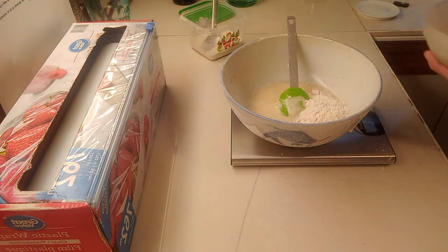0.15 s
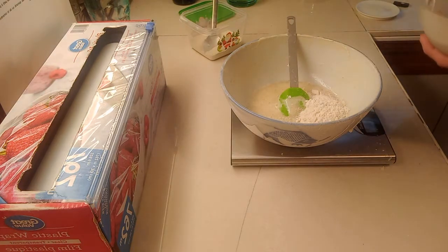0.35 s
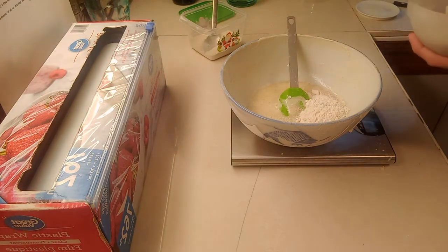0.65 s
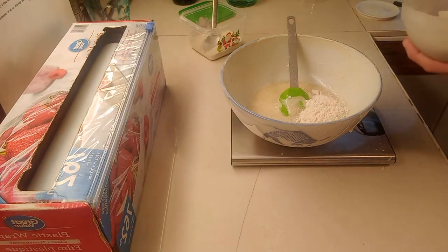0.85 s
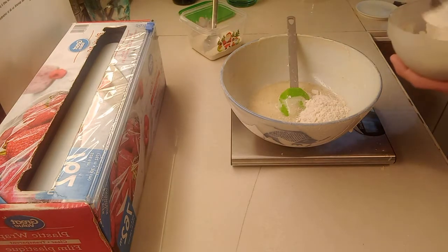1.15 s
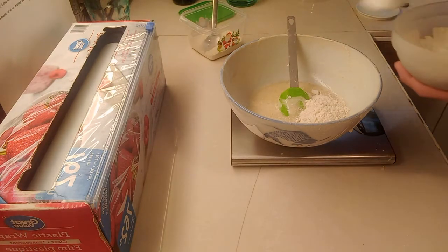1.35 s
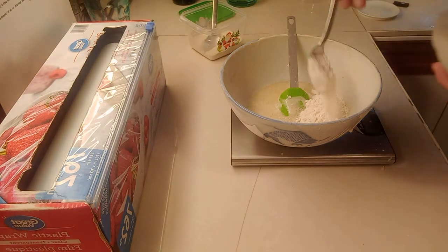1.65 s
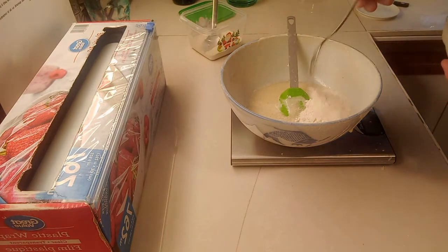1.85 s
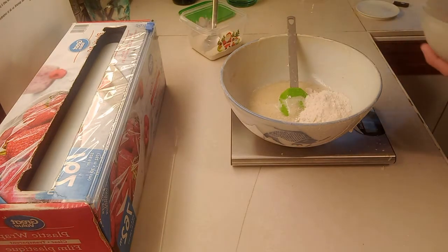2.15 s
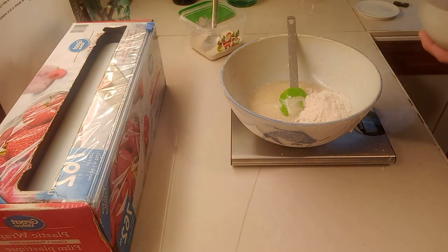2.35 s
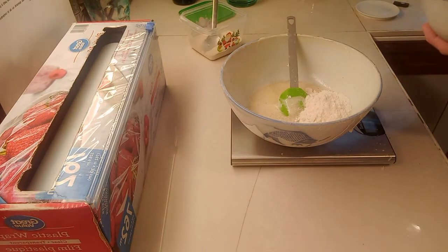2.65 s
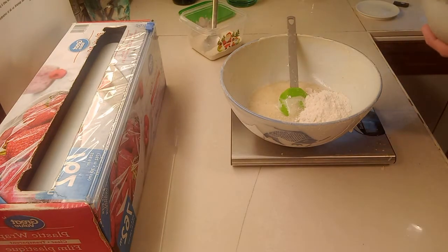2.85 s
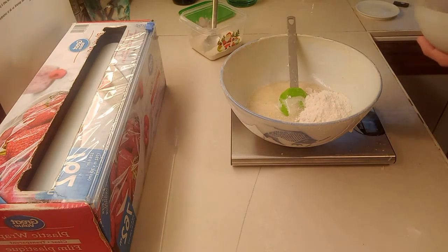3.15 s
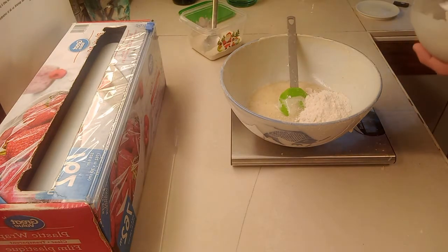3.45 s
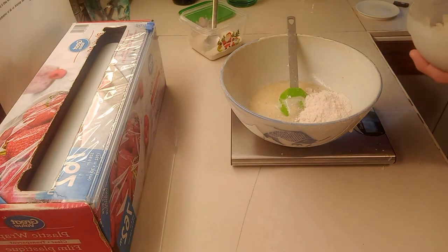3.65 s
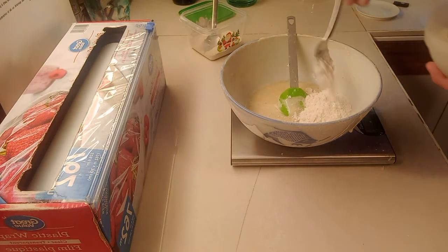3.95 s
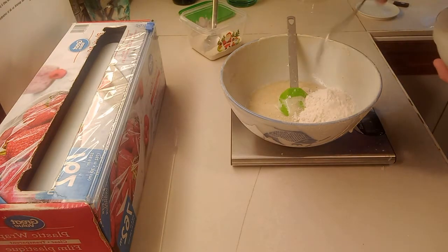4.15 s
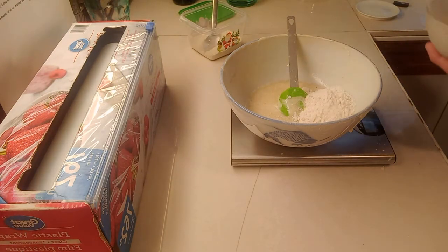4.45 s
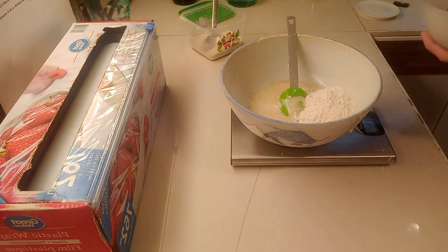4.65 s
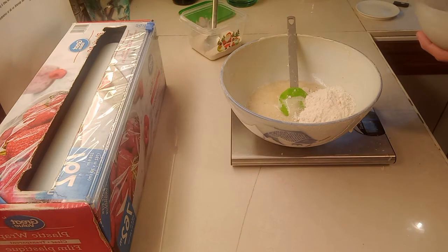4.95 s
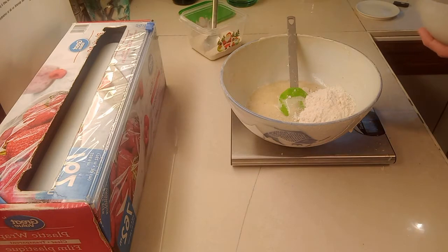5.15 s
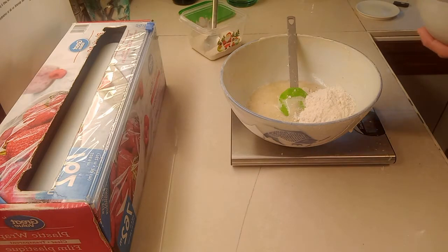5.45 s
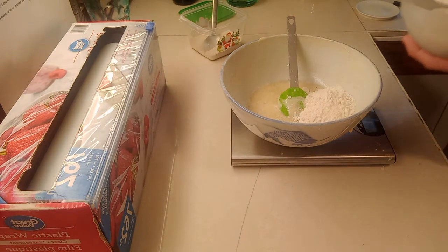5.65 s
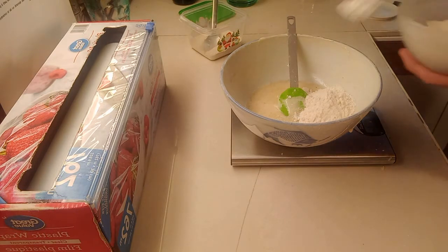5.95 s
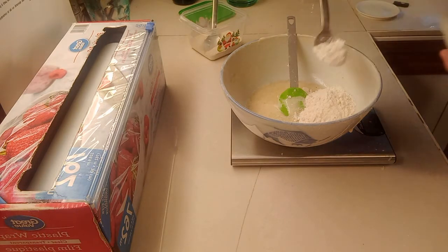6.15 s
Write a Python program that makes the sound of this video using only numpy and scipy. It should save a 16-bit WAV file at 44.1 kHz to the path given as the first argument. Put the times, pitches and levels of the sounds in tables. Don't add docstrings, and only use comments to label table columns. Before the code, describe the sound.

A bright spoon clink on ceramic, two short crunchy flour scoops, a pair of taps, light ticks, a slow scrape and muffled knock over faint room rumble.

```python
import sys
import numpy as np
from scipy import signal
from scipy.fft import rfft, irfft
from scipy.io import wavfile
from scipy.ndimage import uniform_filter1d

SR = 44100
rng = np.random.default_rng(int(sys.argv[2]) if len(sys.argv) > 2 else 0)


def transcribe(u):
    v = np.clip(np.atleast_2d(u).T, -1, 1)
    q = np.round(v * 32767).astype(np.int16)
    wavfile.write(sys.argv[1], SR, q)


def volts_from_db(level):
    exponent = np.asarray(level, float) / 20
    return 10 ** exponent


N = 278214

# frequency in Hz, density in dB per Hz.
FAINT_CRACK = [(500, -14.5), (2000, -4.5), (3300, -0.5), (5000, -6), (7500, 3.5), (9500, 0), (16000, -22)]


def evened(x):
    return x / np.sqrt(np.mean(x ** 2) + 1e-20)


def read(points, hz):
    f, value = np.transpose(points)
    return np.interp(np.log(hz + 1), np.log(f + 1), value)


def coloured(x, points):
    hz = abs(np.fft.fftfreq(4096, 1 / SR))
    log_gain = np.log(volts_from_db(np.maximum(read(points, hz), -100)))
    response = np.exp(np.conj(signal.hilbert(log_gain)))
    taps = np.fft.ifft(response).real[:2048]
    taps = taps.reshape((1,) * (x.ndim - 1) + (-1,))
    return signal.oaconvolve(x, taps, axes=-1)[..., :x.shape[-1]]


def resonate(x, hz, width):
    r = np.exp(-np.pi * width / SR)
    return 2 * signal.lfilter([1 - r], [1, -r * np.exp(2j * np.pi * hz / SR)], x).real


def mode_sum(x, modes):
    return sum(volts_from_db(db) * evened(resonate(resonate(x, hz, w), hz, w)) for hz, w, db in modes)


def spaced(x, lag, left_db):
    f = np.fft.rfftfreq(x.shape[-1])
    late = irfft(rfft(x[0]) * np.exp(-2j * np.pi * f * lag), x.shape[-1])
    return np.array([late * volts_from_db(left_db), x[1]])


def add(mix, s, sound):
    part = mix[:, round(s * SR):][:, :sound.shape[1]]
    part += sound[:, :part.shape[1]]


def hits(rows, modes, crack_colour, crack_s, rise_s, side=((500, .1), (15000, .1)), hold=0.95,
         inverted=None, apart=False):
    ring_turn = .24
    cracks, rings = np.zeros((2, N)), np.zeros((2, N))
    t = np.arange(SR // 2) / SR
    side, rise = np.array(side), 1 - np.exp(-t / rise_s)
    hz, db, t60 = np.transpose(modes)[:, :, None]
    for s, peak_db, ring_db, tilt_db, lag in rows:
        shared, own = rng.standard_normal(len(t)), rng.standard_normal((2, len(t)))
        tilted = [(f, level + tilt_db * np.log2(f / 2000)) for f, level in crack_colour]
        contact = np.exp(-(t / crack_s) ** hold) * rise
        crack = coloured((0.94 * shared + 0.51 * own) * contact, tilted)
        crack = np.array([coloured(crack[0], side * [1, .5]), coloured(crack[1], side * [1, -.5])])

        if inverted is None:
            phase = rng.uniform(0, 2 * np.pi, (len(modes), 1))
        else:
            phase = np.pi * np.isin(hz, inverted)
        phase = np.array([phase + 2 * np.pi * (hz * lag / SR + ring_turn), phase])
        level = db + tilt_db * np.log2(hz / 2000) - 60 * t / t60
        lean = np.array([.5, -.5])[:, None, None] * read(side, hz)
        ring = (volts_from_db(level + lean) * np.sin(2 * np.pi * hz * t + phase)).sum(1) * rise

        for out, part, part_db in ((cracks, crack, 0), (rings, ring, ring_db)):
            add(out, s, volts_from_db(peak_db + part_db) * spaced(part / abs(part).max(), lag, -0.55))
    return (cracks, rings) if apart else cracks + rings


def strokes(rows, spoon, grit, lag):
    range_db = 30
    out = np.zeros((2, N))
    for peak_s, pressure_db, swell_s, fade_s, bright_db in rows:
        t = np.arange(-swell_s, fade_s, 1 / SR)
        force_db = 3.1 * np.minimum(rng.exponential(1, (3, SR // 2)), 5)
        slips = rng.standard_normal((3, SR // 2)) * volts_from_db(force_db)
        slips *= rng.random((3, SR // 2)) < 9000 / SR
        slips = slips[2] + slips[:2] / 2
        low = mode_sum(slips, spoon[:3])
        high = evened(mode_sum(slips, spoon[3:])) + 0.78 * evened(coloured(slips, grit))
        sound = (evened(low) + volts_from_db(bright_db) * evened(high))[:, -len(t):]
        sound = sound * volts_from_db(pressure_db - range_db * np.maximum(-t / swell_s, t / fade_s))
        add(out, peak_s - swell_s, spaced(sound * signal.windows.tukey(len(t), .1), lag, -1.2))
    return out


def bed(colour, patchy_db):
    # frequency in Hz, likeness of the sides from 0 to 1.
    likeness = [(60, 0.22), (130, 1), (290, 0.4), (640, 0.99), (1410, 0.057), (3100, 0.016), (6820, 0.63)]
    # frequency in Hz, left level in dB.
    left_levels = [(60, -1), (110, -1), (200, 1.5), (380, -4), (700, -2), (1290, -0.5), (2380, 1.5),
                   (4400, -7), (8120, -0.5), (15000, -1)]
    alike_top_hz = 5000
    far_lag = 14
    frames, hz = N // 512 + 5, np.fft.rfftfreq(2048, 1 / SR)
    a, b, c, d, patches = rng.standard_normal((frames, 1025, 5)).T
    patches = evened(uniform_filter1d(uniform_filter1d(patches, size=6, axis=0), size=8, axis=1))
    same = (np.clip(read(likeness, hz), -1, 1) * (hz < alike_top_hz))[:, None]
    right = a + 1j * b
    delay = np.exp(-2j * np.pi * hz * far_lag / SR)[:, None]
    left = same * right * delay + np.sqrt(1 - same ** 2) * (c + 1j * d)
    z = np.array([left * volts_from_db(read(left_levels, hz))[:, None], right])
    z = z * volts_from_db(read(colour, hz)[:, None] + patchy_db * patches)
    return evened(signal.istft(z, nperseg=2048, noverlap=1536)[1][:, :N])


def background():
    # frequency in Hz, density in dB per Hz.
    rumble_colour = [(18, -64), (30, -39), (52, -13.5), (80, 2), (171, -10.5), (198, -14), (309, -9),
                     (339, -16), (365, -8.5), (415, -7.5), (500, -15.5), (839, -25), (973, -26.5),
                     (1360, -42.5), (2500, -45), (3250, -69.5), (5500, -120)]
    # frequency in Hz, density in dB per Hz.
    hiss_colour = [(590, -26), (1000, 2.5), (1370, -2.5), (3510, -7.5), (4450, -3.5), (4650, -3), (4870, 0),
                   (5610, -7.5), (9850, -8), (15200, -10.5), (16500, -16)]
    # frequency in Hz, width in Hz, level in dB.
    whine_bands = [(4740, 22, -91.5), (10400, 250, -104)]
    # frequency in Hz, level in dB.
    core_hz, core_db = (4756, -93.5)
    t = np.arange(N) / SR
    early_db, settle_s = 4.5, 1.8
    settling = np.exp(-(t / settle_s) ** 2)
    rumble = volts_from_db(-67.5 + early_db * settling) * bed(rumble_colour, patchy_db=2.0)
    hiss = volts_from_db(-82) * bed(hiss_colour, patchy_db=1.34)
    noise = rng.standard_normal((3, N))
    noise = noise[:2] + 0.22 * noise[2]
    whine = mode_sum(noise, whine_bands)
    whine = whine + volts_from_db(core_db) * evened(np.sin(2 * np.pi * core_hz * t))
    return rumble + hiss + whine


def faint_ticks():
    # start in seconds, peak in dB, ring in dB, tilt in dB per octave, left lag in samples.
    ticks = [
        (0.049, -52.5, -13, 0, 11.7),
        (2.8312, -59.5, -3, 0.0021, 8.7),
    ]
    # frequency in Hz, level in dB, t60 in s.
    modes = [(966, 7, 0.03), (4235, -12, 0.067), (5920, -3, 0.06), (7160, -6, 0.032)]
    return hits(ticks, modes, FAINT_CRACK, crack_s=0.003, rise_s=0.00012)


def brushes():
    # start in seconds, peak in dB, ring in dB, tilt in dB per octave, left lag in samples.
    touches = [
        (0.385, -85, 16, -14, 8),
        (0.934, -76, 6, 6, 8),
        (0.959, -80, 6, 6, 8),
    ]
    # frequency in Hz, level in dB, t60 in s.
    modes = [(930, -0.5, 0.065), (4130, -5.5, 0.05), (4200, -4, 0.04)]
    return hits(touches, modes, FAINT_CRACK, crack_s=.004, rise_s=.006)


def rim_clink():
    # start in seconds, peak in dB, ring in dB, tilt in dB per octave, left lag in samples.
    blow = [
        (0.4118, -15, 4, 2, 8.8),
    ]
    # frequency in Hz, level in dB, t60 in s.
    modes = [(884, 2, .07), (912, -4, .19), (946, -14, .09), (2234, -5, .14), (2268, -7, .32),
             (2289, -13, .24), (2316, -16, .22), (2363, -16, .1), (2438, -24, .1), (4044, -8, .1),
             (4067, -2, .15), (4092, -7, .1), (4122, 1.5, .14), (4137, -3, .11), (4241, -17, .1),
             (4484, -18, .06), (6175, -11, .13), (6207, -10, .1), (6234, -17, .22), (6321, -18, .23),
             (6364, -17, .25), (7090, -23, .12), (7214, -24, .12), (8811, -26, .19), (8820, -3, .042),
             (10750, -31, .2), (11850, -29, .12), (12172, -30, .24), (12226, -24, .15), (13885, -35, .22),
             (14050, -32, .2), (14350, -32, .14), (14600, -33, .08)]
    # frequency in Hz, density in dB per Hz.
    crack = [(80, -14), (400, -15.5), (880, -10.5), (1500, -9), (2270, -3), (2550, -8.5), (3300, -9.5),
             (4150, -4.5), (5500, -16), (6300, -11), (7500, -9), (9000, -17.5), (9700, -40), (10300, -45.5),
             (12200, -7), (14200, -17), (14900, -41.5), (16500, -55)]
    # frequency in Hz, left minus right in dB.
    side = [(900, 2.5), (2270, -1), (4100, -1), (6300, -15.5), (7400, -3.5), (8820, 19.5), (10500, -8),
            (12300, 1.5), (14000, 2)]
    inverted = [946, 2289, 4122, 4137, 8811]
    return hits(blow, modes, crack, crack_s=0.0075, rise_s=.0003, side=side, hold=1.8,
                inverted=inverted, apart=True)


def thuds():
    # start in seconds, peak in dB, ring in dB, tilt in dB per octave, left lag in samples.
    jerks = [
        (0.416, -53.5, 8.5, -0.5, 11),
        (0.645, -65, 14, 0, 12),
        (3.14, -63, 4, 6, 12),
    ]
    # frequency in Hz, level in dB, t60 in s.
    modes = [(68.4, -1, 0.21), (92, -2.5, 0.048), (123.3, -5.5, 0.056)]
    # frequency in Hz, density in dB per Hz.
    crack = [(40, -11.5), (90, -0.5), (250, -11), (600, -42.5), (2000, -79)]
    return hits(jerks, modes, crack, crack_s=0.025, rise_s=.006)


def bites():
    # start in seconds, peak in dB, ring in dB, tilt in dB per octave, left lag in samples.
    crunches = [(0.593, -47.5, -2, 0.11, 6.3), (0.6195, -48, 1, 3.4, 8.5), (0.625, -53, 5, .1, 6.9),
                (0.647, -41.5, 2.5, .1, 5.1), (0.657, -41, -5, .1, 9), (2.7994, -71, -2, 0.1, 6.2),
                (2.9156, -36.5, -3.5, 0.09, 7.2), (2.922, -50, -12, 0.091, 4.3), (2.98, -52, -25, 3.6, 7),
                (2.992, -53.5, 10.5, .1, 4.6), (3.0005, -45, -9, 3.3, 14), (3.02, -49, -6, .1, 4.8),
                (3.032, -53, -11, .1, 6.1)]
    # frequency in Hz, level in dB, t60 in s.
    modes = [(1108, 17, 0.037), (1265, 4.5, 0.14), (1720, -5, 0.09), (3470, -12, .04), (3940, -8, .04),
             (6400, -7, 0.051)]
    # frequency in Hz, density in dB per Hz.
    crack = [(290, -32), (500, -7), (1060, -24.5), (1400, -27), (1770, -7), (2130, -13.5), (3060, -3.5),
             (4280, -10), (5630, -53), (7100, -12.5), (10100, -21.5), (16000, -24)]
    return hits(crunches, modes, crack, crack_s=0.0108, rise_s=0.00071)


def digging():
    # peak in seconds, pressure in dB, swell in s, fade in s, brightness in dB.
    first_dig = [
        (0.598, -48.5, 0.0032, 0.14, -11),
        (0.672, -40.5, .1, 0.04, -5.5),
    ]
    # peak in seconds, pressure in dB, swell in s, fade in s, brightness in dB.
    second_dig = [
        (2.84, -91, 0.036, 0.11, -1.5),
        (2.92, -45, 0.012, 0.087, -8),
        (3.012, -48.5, 0.051, 0.054, 3.5),
    ]
    # frequency in Hz, width in Hz, level in dB.
    edge_down = [(1140, 230, 1.5), (1249, 62, 9), (1630, 230, -44), (3190, 220, -6), (4120, 140, -17.5),
                 (6460, 230, -0.5), (7400, 1040, -5), (9250, 1100, -11), (11000, 2000, -7),
                 (12830, 450, -20), (14000, 900, -14.5), (15447, 1100, -13)]
    # frequency in Hz, width in Hz, level in dB.
    tipped = [(990, 130, 5), (1260, 19, 8), (1760, 200, -7), (3340, 190, -8.5), (4000, 390, -14),
              (6340, 820, -1.5), (7000, 700, -12.5), (9100, 1100, -18.5), (11000, 1100, -18.5),
              (12300, 720, -21.5), (14200, 900, -22), (15450, 900, -25)]
    # frequency in Hz, density in dB per Hz.
    grit = [(180, -61), (300, -14), (537, -24), (787, -31), (1210, 19), (2070, -78), (3400, -8.5),
            (4990, -4), (6410, 11), (10000, -72), (16000, -32)]
    return strokes(first_dig, edge_down, grit, lag=10.6) + strokes(second_dig, tipped, grit, lag=8.44)


def thumps():
    # start in seconds, peak in dB, ring in dB, tilt in dB per octave, left lag in samples.
    stops = [
        (0.674, -42, 1.2, 0.083, 19),
        (0.680, -37, 0.76, 0.1, 9.1),
        (0.688, -60, -2, .1, 40),
    ]
    # frequency in Hz, level in dB, t60 in s.
    modes = [(314, -4.5, 0.011), (391, -4, 0.021), (997, 5.5, 0.017), (1197, -9, 0.014)]
    # frequency in Hz, density in dB per Hz.
    crack = [(150, -13), (395, 4), (710, -10.5), (1200, -18), (2400, -14.5), (2740, -21), (3220, -22),
             (5000, -31), (6500, -59), (11000, -120)]
    return hits(stops, modes, crack, crack_s=0.00083, rise_s=0.0008,
                side=[(300, -1.5), (600, -6.5), (1200, 0.5)])


def dull_knock():
    # start in seconds, peak in dB, ring in dB, tilt in dB per octave, left lag in samples.
    bounces = [
        (0.86, -38, -10.5, -0.7, 4.4),
        (0.866, -41.5, -16, 0, 6.7),
        (0.879, -60, -10, -5, 5.3),
    ]
    # frequency in Hz, level in dB, t60 in s.
    modes = [(571, 2.5, 0.12), (1130, -1, 0.04), (1550, -25, 0.075), (1950, -5, 0.048), (2360, -3.5, 0.16),
             (375, -10, .06), (4130, -11, 0.09), (4870, 4, 0.012)]
    # frequency in Hz, density in dB per Hz.
    crack = [(150, -5.5), (400, -3.5), (1110, 0), (1270, -3.5), (1530, 5.5), (1990, -12), (2390, 0.5),
             (2800, -28), (4100, -15), (4600, -16), (5050, -16), (5600, -44), (7600, -21), (16000, -61)]
    return hits(bounces, modes, crack, crack_s=0.0019, rise_s=0.00042)


def rustle():
    # middle in seconds, half length in s, level in dB.
    movements = [
        (1.709, 0.11, -82),
        (2.223, 0.12, -86.5),
        (3.653, 0.12, -87.5),
        (5.736, 0.21, -83),
        (6.179, 0.085, -82.5),
    ]
    # frequency in Hz, level in dB.
    colour = [(1500, -17.5), (4000, -8), (6300, -8.5), (7500, 0.5), (8700, -9.5), (12000, -14.5),
              (16000, -14.5)]
    t = np.arange(N) / SR
    swell = sum(volts_from_db(db) * np.exp(-((t - s) / half) ** 2) for s, half, db in movements)
    return swell * evened(coloured(rng.standard_normal((2, N)), colour))


def wall_tap():
    # start in seconds, peak in dB, ring in dB, tilt in dB per octave, left lag in samples.
    tap = [
        (3.137, -28.5, 1.5, 3.5, 5.4),
    ]
    # frequency in Hz, level in dB, t60 in s.
    modes = [(564, -12.5, 0.44), (2305, -7, 0.2), (1200, -2, 0.055), (1890, 3, .04), (3580, -24, 0.089),
             (3530, -3, 0.038), (4120, -12, 0.061), (4055, -1.5, 0.043), (4980, 9, 0.0099),
             (7570, -18, 0.069), (6330, 1.5, 0.072), (7300, -5, 0.042), (8700, -22, .06),
             (11940, -18, 0.073)]
    # frequency in Hz, density in dB per Hz.
    crack = [(120, -52), (300, -2), (737, 7.5), (1500, 1), (1950, -13), (2360, -4), (3240, -12), (4090, 4),
             (5610, -8.5), (6410, -19), (8220, -21), (8940, -18), (14500, -22), (16000, -42)]
    return hits(tap, modes, crack, crack_s=0.0083, rise_s=0.00043)


def second_tap():
    # start in seconds, peak in dB, ring in dB, tilt in dB per octave, left lag in samples.
    tap = [
        (3.268, -30.5, -2.5, 0.1, 8.3),
    ]
    # frequency in Hz, level in dB, t60 in s.
    modes = [(847, -8.5, 0.075), (2330, -10.5, 0.13), (2354, -2, 0.073), (3125, -7, 0.021),
             (4000, -16, 0.033), (4670, -26, 0.055), (6300, 3, 0.036), (6350, -16, 0.0481),
             (7470, 0.5, 0.017), (8910, -11.5, 0.043)]
    # frequency in Hz, density in dB per Hz.
    crack = [(180, -43), (300, -17), (725, 5.5), (1360, 1), (2280, 6), (2880, -21.5), (4020, 2), (6410, -8),
             (8360, -21.5), (14500, -21), (16000, -87)]
    return hits(tap, modes, crack, crack_s=0.0022, rise_s=0.00091)


def edge_ticks():
    # start in seconds, peak in dB, ring in dB, tilt in dB per octave, left lag in samples.
    ticks = [
        (4.7192, -41, -13.5, 8, 7.2),
        (4.7683, -51, -6.5, 1, 7.1),
        (4.8068, -50, -35, 0, 6.1),
    ]
    # frequency in Hz, level in dB, t60 in s.
    modes = [(1134, 3.5, 0.035), (4100, -12.5, 0.17), (5950, -8, 0.023), (8400, -9, 0.033),
             (14400, -19, 0.13)]
    # frequency in Hz, density in dB per Hz.
    crack = [(150, -16), (350, 5), (800, -9), (1160, -6.5), (1500, -32), (3070, -7), (3600, -18),
             (4120, -13), (6000, -20.5), (8900, -10), (9600, -17), (14100, -17.5), (16500, -12)]
    return hits(ticks, modes, crack, crack_s=0.0047, rise_s=0.00029)


def flat_scrape():
    # start in seconds, peak in dB, ring in dB, tilt in dB per octave, left lag in samples.
    catches = [
        (4.931, -63, 3, -1, 10.3),
        (4.955, -53.5, -10, 2.5, 8.7),
        (4.9662, -52.5, -19, -5, 8.7),
        (5.0645, -47, -6, 3.5, 6.42),
        (5.093, -47, -22, 4.5, 9.5),
    ]
    # frequency in Hz, level in dB, t60 in s.
    modes = [(1050, 2, 0.026), (1193, 2, 0.03), (1950, 1, 0.043), (3130, -15, 0.035), (4300, -12, 0.04),
             (6000, -6, 0.04), (7300, 0, .04)]
    # peak in seconds, pressure in dB, swell in s, fade in s, brightness in dB.
    drags = [
        (4.774, -85.5, .02, 0.11, 7),
        (4.974, -55, 0.069, 0.052, -3.5),
        (5.078, -59.5, 0.099, .12, -5.5),
    ]
    # frequency in Hz, width in Hz, level in dB.
    flat_spoon = [(1062, 107, 8), (1210, 140, 10), (2010, 530, 9), (3110, 390, -12.5), (4360, 310, -9),
                  (5700, 580, -15), (7340, 360, -8), (8750, 720, -17), (11650, 1100, -20)]
    # frequency in Hz, density in dB per Hz.
    fine_grit = [(300, -40), (800, -31), (1140, 7), (1500, -15), (2050, 4), (2750, -42), (3200, -3),
                 (3600, -46), (3900, -50), (4350, -23), (5200, -12), (6000, -5), (7400, -16), (10000, -21),
                 (16000, -25.5)]
    # frequency in Hz, gain in dB.
    gaps = [(1500, -2), (1600, -7), (1750, -1.5), (2550, 2.5), (2800, -15), (3000, 6.5), (3380, 0),
            (3600, -30), (3950, -24), (4150, -1), (4900, -4), (5150, -16), (5400, -1.5)]
    jolts = hits(catches, modes, fine_grit, crack_s=0.0038, rise_s=0.00026)
    return coloured(jolts + strokes(drags, flat_spoon, fine_grit, lag=8.2), gaps)


def muffled_knock():
    # start in seconds, peak in dB, ring in dB, tilt in dB per octave, left lag in samples.
    knock = [
        (5.291, -43.5, -7, 5, 7.1),
    ]
    # frequency in Hz, level in dB, t60 in s.
    modes = [(745, 5.5, 0.066), (1132, -10, 0.049), (1948, 3.5, 0.043), (2500, -10, 0.12), (3540, 0, 0.015),
             (4350, -17, 0.05)]
    # frequency in Hz, density in dB per Hz.
    crack = [(180, -48), (300, 1), (749, 7), (1390, -4.5), (1970, 1), (2440, 1), (2840, -17), (4440, -7.5),
             (5430, -24), (7000, -23), (16000, -69)]
    return hits(knock, modes, crack, crack_s=0.0028, rise_s=0.00071)


def kitchen(x):
    # frequency in Hz, t60 in s.
    decay = [(200, 0.2944), (600, 0.35), (1500, 0.22), (4000, 0.32), (8000, 0.17), (15000, 0.17)]
    bend_db = 1.5
    taps = np.zeros((2, SR // 2))
    at = np.arange(60, SR // 2 - 20, 20) + rng.integers(0, 20, (2, (SR // 2 - 61) // 20))
    np.put_along_axis(taps, at, rng.choice([-1., 1.], at.shape), 1)
    hz, t, z = signal.stft(taps, SR, nperseg=256)
    fall_db = -60 * t / read(decay, hz)[:, None] - bend_db * (10 * t) ** 2
    tail = signal.istft(z * volts_from_db(fall_db), SR, nperseg=256)[1]
    return signal.fftconvolve(x + 0.84 * x[::-1], tail / np.linalg.norm(tail[0]), axes=1)[:, :N]


def worktop(x):
    # frequency in Hz, gain in dB.
    dips = [(5750, -2), (8300, -18), (10350, -12.5), (13050, -9.5)]
    half_hz = 403.5
    return coloured(x, [(hz + side * half_hz, db * (side == 0)) for hz, db in dips for side in (-1, 0, 1)])


def scene():
    crack, ring = rim_clink()
    struck = faint_ticks() + brushes() + dull_knock() + wall_tap() + second_tap()
    struck += edge_ticks() + muffled_knock()
    scraped = thuds() + bites() + digging() + thumps() + flat_scrape()
    room = kitchen(volts_from_db(-1) * crack + volts_from_db(-13) * ring + volts_from_db(-4.5) * struck + volts_from_db(-8.0) * scraped)
    return worktop(crack + ring + struck + scraped + room) + rustle() + background()


def band_limit(x):
    return signal.sosfilt(signal.butter(12, 16710, fs=SR, output="sos"), x)


def record(dry):
    lowpass = signal.firwin(511, 15850, window=("kaiser", 9), fs=SR)
    limited = signal.oaconvolve(dry, lowpass[None], "same")
    return band_limit(limited + volts_from_db(-29.5) * dry)


dry = scene()
out = record(dry)
transcribe(out)
```